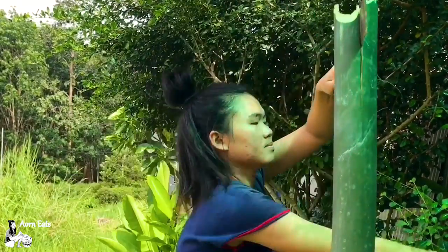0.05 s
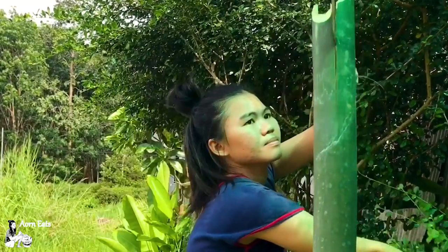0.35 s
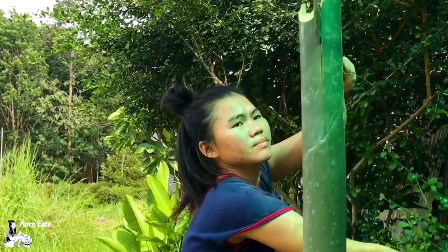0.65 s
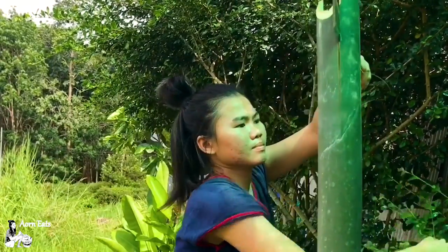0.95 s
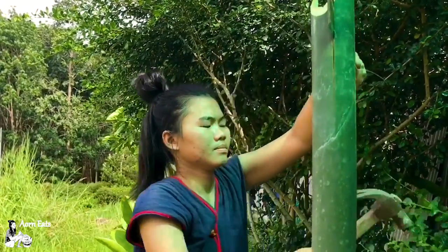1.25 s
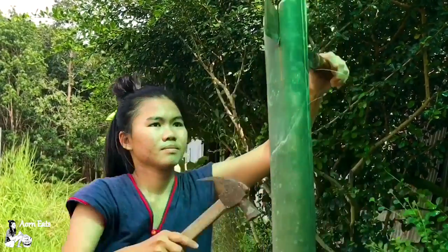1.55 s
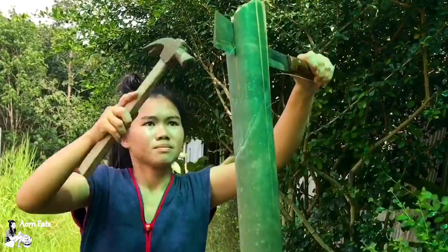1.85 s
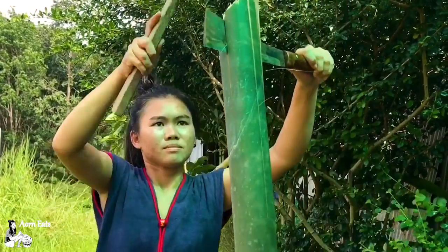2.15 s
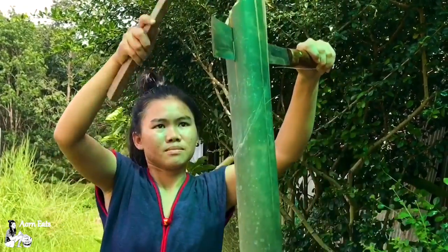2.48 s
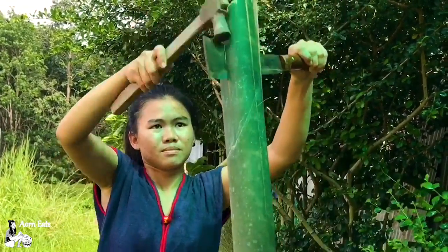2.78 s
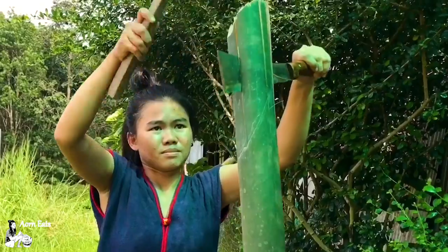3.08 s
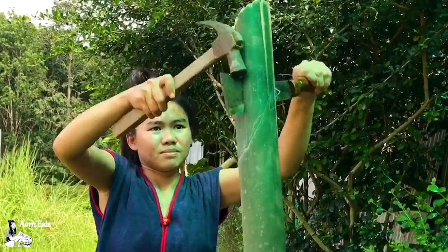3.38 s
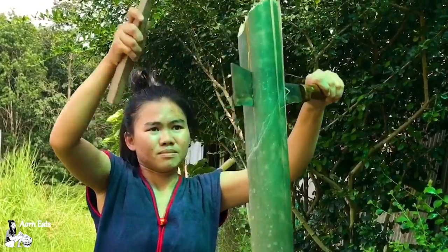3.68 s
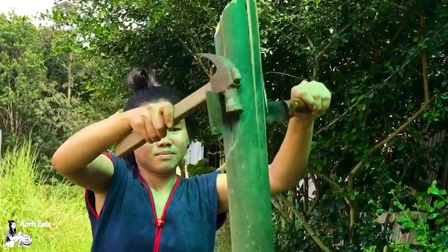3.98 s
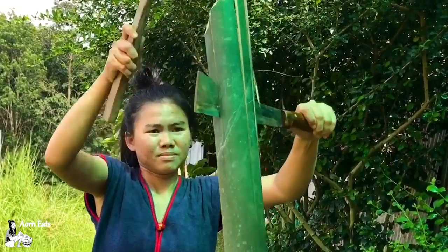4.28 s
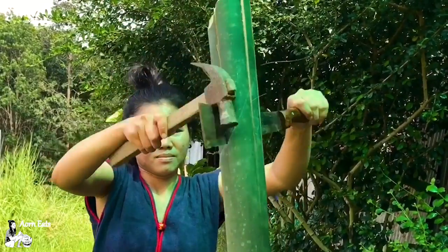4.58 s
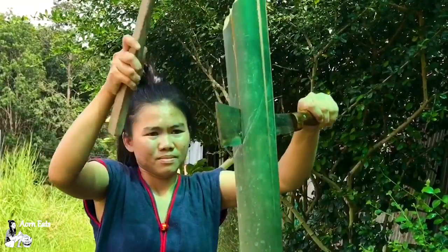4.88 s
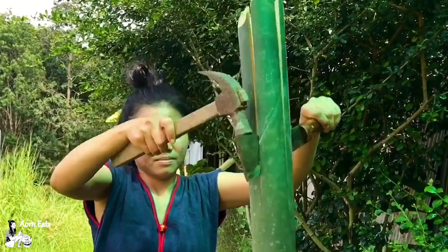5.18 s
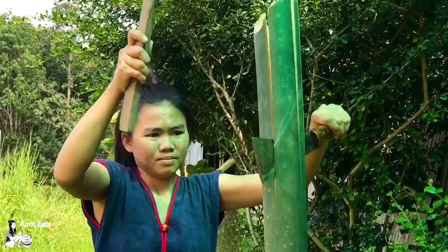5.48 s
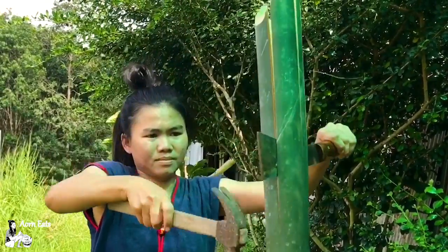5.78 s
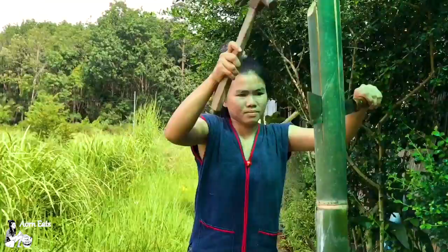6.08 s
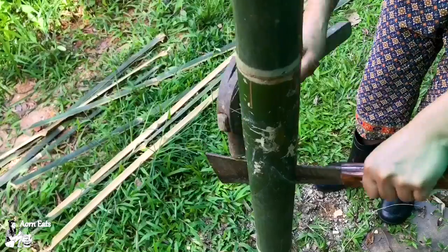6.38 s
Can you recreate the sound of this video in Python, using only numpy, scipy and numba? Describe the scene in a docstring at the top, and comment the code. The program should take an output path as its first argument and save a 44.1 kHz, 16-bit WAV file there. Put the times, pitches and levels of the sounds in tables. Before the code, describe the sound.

A hammer knocks a blade down a bamboo stalk in sharp, ringing metal blows with woody cracks, while small birds chirp outdoors.

```python
"""Splitting green bamboo

A steel hammer drives a blade down a standing stalk in a garden, about two blows a second; some bounce.
Each blow excites the modes of the steel and cracks the hollow stalk, whose resonances rise as it splits.
One bird chirps and others whistle far off, over faint rubbing, air rumble and a high hiss.
A limiter flattens the first milliseconds of the blows."""
import sys
import numpy as np
from scipy import signal
from scipy.fft import rfft, irfft
from scipy.io import wavfile
from scipy.ndimage import uniform_filter1d, minimum_filter1d
from numba import njit

SR = 44100
rng = np.random.default_rng(int(sys.argv[2]) if len(sys.argv) > 2 else 0)


def pcm_store(signal):
    """Save signal as 16-bit PCM."""
    levels = np.round(np.clip(np.atleast_2d(signal), -1, 1) * 32767)
    wavfile.write(sys.argv[1], SR, levels.astype(np.int16).T)


N = 292824
T = np.arange(N) / SR
AGE = T[:SR]  # the first second of an event, t/s

# spectrum of cracking fibres: f/Hz, spectral level/dB
FIBRE_SPECTRUM = [(100, -51), (300, -8), (550, -5), (850, 10), (1500, 7), (2500, 6), (4000, -3),
                  (7000, -10), (16000, -34)]
# the split runs down the stalk: t/s, closed tube length/m, grip factor on the steel's decay time
SPLIT_PROGRESS = [(2.3, .73, 0.5), (3.456, 0.56, 0.72), (4.6, 0.46, 0.74), (5.189, 0.434, 0.49),
                  (5.78, 0.3365, 0.45), (6.4, 0.32, 0.89)]


def blows():
    """Impact excitation: steel clashes on steel and rings on while the stalk gives way."""
    # t/s, force/dB, stalk/dB, air column/dB, steel/dB, contact point/cm, hardness/(dB per octave)
    strikes = [(2.3041, 0.5, -4.5, -21.5, -2, 2.8, -1), (2.8733, 1, -11.5, -23.5, 2.5, 27.3, -3),
               (3.4565, 0.5, -7, -25.5, -1.5, 15.32, 3.5), (4.005, -0.5, -6, -20, 3.5, 12.2, 2),
               (4.0401, -4.5, -5, -16.5, 3, 27.8, 2.5), (4.594, 4, -7, -13.5, 8, 1.4, 12),
               (4.6174, -2.5, -5, -26, 1.5, 14.93, -2), (5.1929, 1.5, -2, -22.5, 0.5, 24, 2),
               (5.7805, 3.5, -0.5, -13, 1.5, 2.05, -1), (6.412, -2, 2.5, -13, -11.5, 16.1, 23)]
    # the instant of steel contact: f/Hz, spectral level/dB
    clash_spectrum = [(300, -36), (1500, -1), (3000, 8.5), (5300, 14.5), (7000, 5), (9000, 7.5),
                      (10500, -2), (12500, 5.5), (14000, -7), (15200, 1.5), (17000, -46)]
    rings, cracks = np.zeros((2, N))
    for s, force_db, stalk_db, air_db, steel_db, contact_cm, hardness_db in strikes:
        _, grip = split(s)
        clash = undb(-12) * noise(clash_spectrum, SR) * fade(0.041)
        wood = stalk(s, air_db, tilt_db=0, t60=0.06) + undb(-14) * splinters()
        add(rings, s, undb(force_db + steel_db) * steel(contact_cm, hardness_db, grip))
        add(cracks, s, undb(force_db) * (clash + undb(stalk_db) * wood))
    return rings, cracks


def steel(contact_cm, hardness_db, grip, wavelength_cm=8, reference_hz=4400, node_db=-26):
    """A bending mode is excited as far as it moves at the contact point; hard contact favours high ones."""
    # modes of blade and hammer head: f/Hz, level/dB, T60/s before the grip factor
    modes = [(4324, -20, 0.14), (4376, -9.5, 0.063), (5250, -17, 0.1), (5380, -29, 0.3), (5823, -22, 0.37),
             (5821, -38.5, 0.81), (6783, -36, 0.063), (8070, -3.5, 0.056), (8068, -20, 0.16),
             (9110, -12, 0.066), (12140, -23, 0.081), (14500, -46, 0.02)]
    hz, db, t60 = np.transpose(modes)
    # dispersion: bending wavelength falls as the square root of frequency
    motion = np.cos(2 * np.pi * contact_cm / wavelength_cm * np.sqrt(hz / reference_hz))
    coupling_db = 20 * np.log10(np.hypot(motion, undb(node_db)))
    db = db + coupling_db + hardness_db * np.log2(hz / 7000)
    return ring(zip(hz, db, t60 * grip), detune=0.0014)


def stalk(s, air_db, tilt_db, t60, sound_m_s=343):
    """Cracking fibres excite wall and air column, which resonate higher and die sooner in a shorter tube."""
    # higher modes of the stalk: f/Hz, level/dB, T60/s
    modes = [(1100, -33, 0.015), (1352, -20.5, 0.036), (1536, -28, 0.028), (1906, -31, 0.043),
             (2350, -30, 0.027)]
    tube_m, _ = split(s)
    remaining = tube_m / SPLIT_PROGRESS[0][1]
    air_hz = sound_m_s / (2 * tube_m)  # half-wave resonance
    wall_hz = 716 / remaining ** 0.499
    decay_factor = remaining ** 0.84  # the open split damps wall and air column
    crack = undb(-14.5) * noise(FIBRE_SPECTRUM, SR, tilt_db) * fade(t60)
    # little radiates below the air column's resonance
    crack = signal.sosfilt(signal.butter(2, air_hz, "high", fs=SR, output="sos"), crack)
    hollow = ring([(air_hz, air_db, 0.09 * decay_factor)], detune=0.0024) * rise(0.0048)
    wall = ring(modes + [(wall_hz, -17.5, 0.063 * decay_factor)], detune=0.011)
    return crack + hollow + wall


def split(s):
    """Crack growth sets the closed tube's length and the damping of the gripped blade at time s."""
    times, tube_m, grip = np.transpose(SPLIT_PROGRESS)
    return np.interp(s, times, tube_m), np.interp(s, times, grip)


def splinters(count=18, spread_s=0.06):
    """Progressive fracture: single fibres snap in turn, ever weaker as the split comes to rest."""
    out = np.zeros(SR)
    snap = noise(FIBRE_SPECTRUM, SR, tilt_db=2.6)
    for delay, size in rng.random((count, 2)):
        add(out, spread_s * delay, size * np.roll(snap, int(size * SR)) * fade(0.012))
    return out * fade(0.1)


def knocks():
    """Impact on wood alone: hammer or blade bumps the stalk without ringing the steel."""
    # t/s, level/dB, brightness/(dB per octave), air column/dB
    bumps = [(.555, -34.5, 0, -26), (1.744, -32, 3.5, -28), (2.4133, -21, -1, -9),
             (2.8659, -1.5, -.5, -27.5), (4.1443, -22, -1, -32), (4.7056, -21.5, -2, -5.5),
             (4.721, -13, -3.5, -31), (6.39, -27, 11, -30), (6.403, -3, 0.5, -26), (6.46, -24, -6, -22)]
    out = np.zeros(N)
    for s, db, tilt_db, air_db in bumps:
        add(out, s, undb(db) * stalk(s, air_db, tilt_db, t60=0.068))
    return out


def rubbing():
    """Sliding friction: hand and blade rub unevenly on the stalk as the blade is set, with a faint rasp."""
    # strokes: middle t/s, duration/s, level/dB
    rubs = [(0.873, 0.29, -57), (1.76, 0.65, -60)]
    # the soft rub and the treble rasp: f/Hz, spectral level/dB
    rub_spectrum = [(1000, -8), (3000, 5), (4500, -1), (7000, -1), (12000, -4), (16000, -4)]
    rasp_spectrum = [(2500, -24), (4000, -1), (4600, 1), (5300, -8), (6200, 0), (7200, -15), (10000, -31)]
    rub = noise(rub_spectrum, N) * sum(swell(*row) for row in rubs)
    rasp = noise(rasp_spectrum, N) * swell(s=2.14, length=1, db=-60.5)
    return (rub + rasp) * undb(2 * walk(70))


def chirps(warble_hz=125.4, warble_depth=0.096, fall_s=0.046, close_s=0.031, overlap_s=0.004):
    """Frequency modulation: a bird's warbled fall runs into a steadier closing note."""
    # t/s, level/dB, pitch factor, duration factor, closing note/dB
    calls = [(1.071, -32.5, 0.97, 0.89, 0.5), (1.449, -26, 0.99, 1.1, -1.5),
             (4.565, -31.5, 0.97, 0.87, 1.5), (4.836, -33.5, .99, 0.93, 6),
             (4.946, -23.5, 1.03, 1.02, -0.5), (5.765, -24, 1.034, 0.98, 1.5)]
    fall_hz, close_hz = np.array([(1907, 2450, 1398), (1570, 1854, 1683)])  # start, turn, end
    out = np.zeros(N)
    for s, db, pitch, stretch, close_db in calls:
        warble = warble_depth * np.sin(2 * np.pi * (warble_hz * AGE + rng.random()))
        fall = note(fall_s * stretch, *pitch * fall_hz, warble)
        close = note(close_s * stretch, *pitch * close_hz, 0.045 * walk(306))
        add(out, s, undb(db) * fall)
        add(out, s + fall_s * stretch - overlap_s, undb(db + close_db) * close)
    return undb(3) * out


def whistles():
    """Random frequency modulation makes the thin notes of far birds waver."""
    # t/s, duration/s, level/dB, start f/Hz, turn f/Hz, end f/Hz, relative pitch waver
    calls = [(0.857, 0.042, -54, 4580, 4600, 4540, .006), (2.123, .19, -47, 2600, 2790, 3080, 0.024),
             (2.129, .1, -56.5, 4650, 4720, 4680, .01), (2.391, 0.23, -45, 2930, 3120, 3100, 0.0244),
             (2.598, 0.27, -39, 3105, 2913, 2437, 0.0344), (5.761, 0.074, -36.5, 5480, 5420, 5370, .06)]
    out = np.zeros(N)
    for s, length, db, start_hz, turn_hz, end_hz, waver in calls:
        add(out, s, undb(db) * note(length, start_hz, turn_hz, end_hz, waver * walk(297.8)))
    return out


def note(length, start_hz, turn_hz, end_hz, flutter, turn_at=0.26, loudest_at=0.57, edge_db=-11.5):
    """A bird's gliding pure tone swells and fades; its phase is the integral of its frequency."""
    progress = AGE[AGE < length] / length
    bend = np.interp(progress, [0, turn_at, 1], [1, 0, 1]) ** 1.3
    hz = turn_hz + bend * (np.where(progress < turn_at, start_hz, end_hz) - turn_hz)
    envelope = undb(np.interp(progress, [0, loudest_at, 1], [edge_db, 0, edge_db]))
    envelope *= signal.windows.tukey(len(hz), 0.1)
    return envelope * np.sin(2 * np.pi * np.cumsum(hz * (1 + flutter[:len(hz)])) / SR)


def ground(x, lag_s=0.0072, echo_db=-11):
    """Ground reflection: a delayed copy interferes with the direct sound."""
    return x + undb(echo_db) * np.interp(T - lag_s, T, x, left=0)


def garden(x, near_db, near_t60, far_db, far_t60, share=1):
    """Reverberation: close leaves and trunks scatter the sound; the tree line returns a long, dull tail."""
    # f/Hz, spectral level/dB
    near_spectrum = [(100, 17), (700, 2.5), (2500, -2), (5000, 1), (9000, 2.5), (16000, -1.5)]
    far_spectrum = [(100, 10.5), (2000, -4), (5000, -4), (12000, -13)]
    near = noise(near_spectrum, SR) * fade(near_t60) * rise(0.013)
    far = noise(far_spectrum, SR) * fade(far_t60) * rise(0.016)
    response = undb(near_db) * near / np.linalg.norm(near) + undb(far_db) * far / np.linalg.norm(far)
    return x + signal.fftconvolve(x * share, response)[:N]


def background():
    """Broadband ambient noise: air rumbles and rustles under a high hiss that swells once."""
    # moving air and high hiss: f/Hz, spectral level/dB
    air_spectrum = [(8.8, -6), (15, 5.5), (30, -5), (53, -12), (87, -13.5), (130, -19.5), (258, -23),
                    (408, -26.5), (475, -26.5), (1070, -30), (2130, -32.5), (4220, -41), (6500, -49),
                    (8450, -91), (14300, -120)]
    hiss_spectrum = [(4000, -30), (6500, -8), (7500, -5), (8400, 2.5), (10500, 4), (12000, 0.5),
                     (12700, -6), (13200, -20), (16000, -26)]
    air = noise(air_spectrum, N) * undb(-41 + 0.4 * walk(5))
    hiss = undb(-57) * noise(hiss_spectrum, N) * (1 + swell(s=5.13, length=2.6, db=-11.5))
    return air + hiss


def ring(modes, detune):
    """Modal superposition: damped sines, each slightly detuned and of random sign."""
    out = np.zeros(SR)
    for hz, db, t60 in modes:
        envelope = rng.choice([-1, 1]) * undb(db) * fade(t60)
        out += envelope * np.sin(2 * np.pi * hz * (1 + detune * rng.standard_normal()) * AGE)
    return out


def noise(spectrum, size, tilt_db=0):
    """Spectral shaping: noise of rms 1 with the given spectrum, tilted by tilt_db per octave."""
    hz, db = np.transpose(spectrum)
    octave = np.log2(np.maximum(np.fft.rfftfreq(size, 1 / SR), 1))
    slope_db = tilt_db * np.clip(octave, *np.log2(hz[[0, -1]]))
    gain = undb(np.interp(octave, np.log2(hz), db) + slope_db)
    x = irfft(rfft(rng.standard_normal(size)) * gain, size)
    return x / x.std()


def walk(rate_hz):
    """Random fluctuation: Gaussian values joined by straight lines."""
    knots = np.arange(0, T[-1] + 1, 1 / rate_hz)
    return np.interp(T, knots, rng.standard_normal(len(knots)))


def swell(s, length, db):
    """Raised-cosine envelope that peaks at time s."""
    return undb(db) * np.cos(np.pi * np.clip((T - s) / length, -0.5, 0.5)) ** 2


def rise(tau_s):
    """Exponential build-up with time constant tau_s."""
    return 1 - np.exp(-AGE / tau_s)


def fade(t60):
    """Exponential decay by 60 dB in t60 seconds."""
    return np.exp(-np.log(1000) * AGE / t60)


def undb(db):
    """Level to amplitude ratio."""
    return 10 ** (np.asarray(db) / 20)


def add(track, s, sound):
    """Superpose a sound on a track at time s."""
    start = int(s * SR)
    track[start:start + len(sound)] += sound[:len(track) - start]


def scene(close_up_s=6.2):
    """The direct-to-reverberant ratio conveys distance: close hammering, birds further off, open air."""
    rings, cracks = blows()
    # the last blow is heard from right beside the stalk, with less of the garden
    share = undb(-6 * (T > close_up_s))
    # the stalk's cracks and knocks reverberate in the garden; the steel rings dry
    wood = ground(cracks + knocks())
    wood = garden(wood, near_db=-12, near_t60=0.2, far_db=-30.5, far_t60=0.97, share=share)
    bird = garden(chirps(), near_db=-3.5, near_t60=0.12, far_db=-14.5, far_t60=0.85)
    far_birds = undb(-4.5) * garden(whistles(), near_db=4, near_t60=0.18, far_db=-3.5, far_t60=1)
    return (rings + wood + rubbing() + bird + far_birds + background())[None]


@njit
def peak_envelope(x, release):
    """Peak detection: instant rise, exponential fall."""
    out, peak = np.empty(len(x)), 0.
    for i in range(len(x)):
        peak = max(abs(x[i]), peak * release)
        out[i] = peak
    return out


def record(dry, ceiling=0.48, release_s=0.0054, cutoff_hz=16200):
    """Peak limiting holds the blows at a ceiling; a steep low-pass filter then cuts the top."""
    peak = peak_envelope(dry[0], np.exp(-1 / (release_s * SR)))
    gain = ceiling / np.maximum(peak, ceiling)
    gain = uniform_filter1d(minimum_filter1d(gain, size=15), size=15)  # eases down ahead of each peak
    return signal.sosfilt(signal.ellip(8, 0.2, 70, cutoff_hz, fs=SR, output="sos"), dry * gain)


dry = scene()
out = record(dry)
pcm_store(out)
```